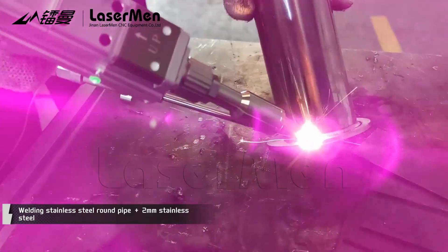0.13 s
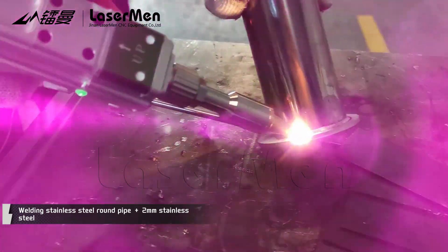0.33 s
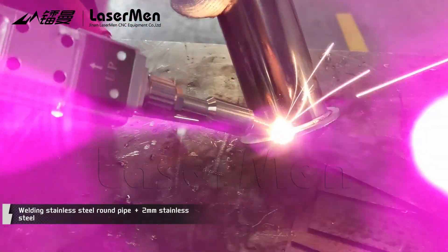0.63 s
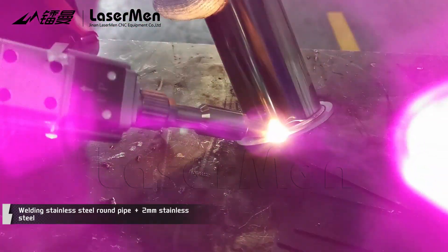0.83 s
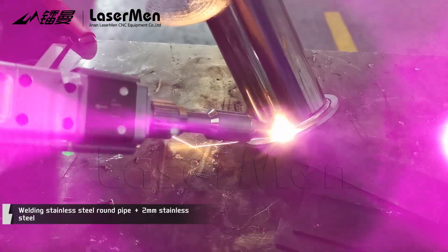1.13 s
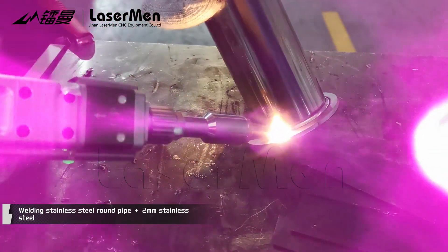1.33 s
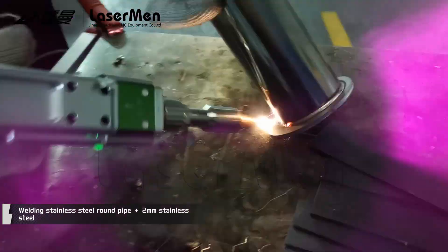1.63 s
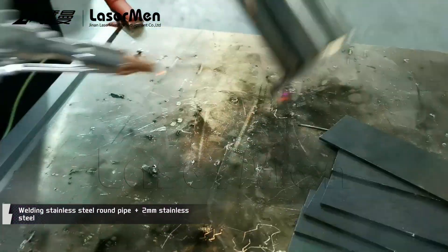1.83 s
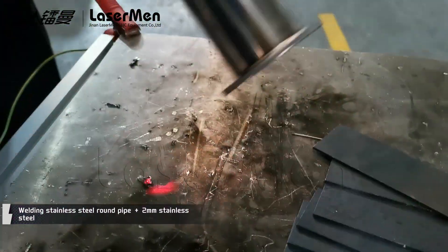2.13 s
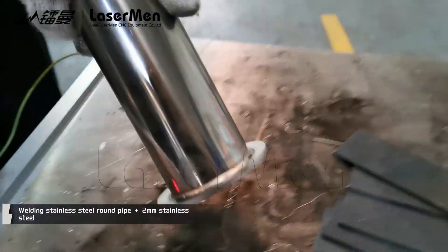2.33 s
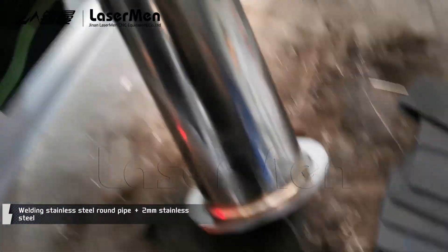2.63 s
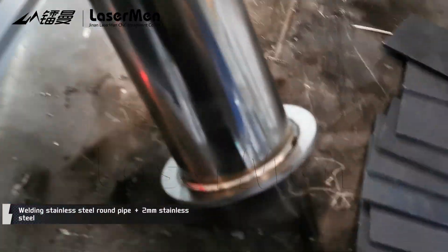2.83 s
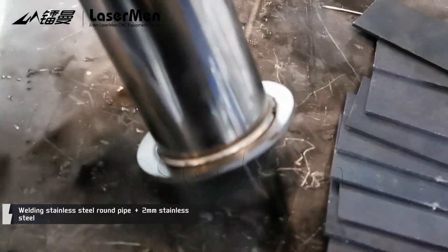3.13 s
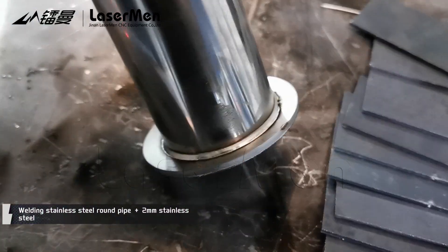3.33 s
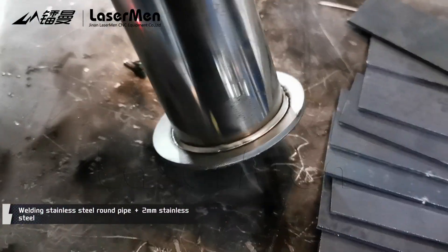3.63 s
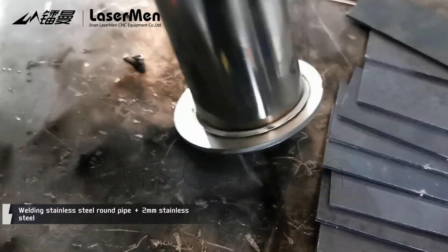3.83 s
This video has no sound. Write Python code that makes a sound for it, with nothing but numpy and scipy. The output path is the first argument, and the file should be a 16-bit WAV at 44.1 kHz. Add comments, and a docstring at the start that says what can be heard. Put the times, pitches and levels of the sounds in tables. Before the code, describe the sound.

A hand-held laser welder hisses and sizzles close by, spitting now and then. The torch clacks and its gas shuts off. A steel pipe thuds softly onto a bench and scrapes around over a low workshop rumble.

```python
"""A hand-held laser welder runs round a steel pipe on a workshop bench: shielding gas rings the nozzle
and splashes off the joint while the melt sizzles and spits. The torch lifts with a clack, the gas blows
freely and is shut off. The pipe is set down with a thud, its cooling seam pings, and it is turned and
dragged, sticking and slipping on the bench, over the rumble of the shop."""
import sys
import numpy as np
from scipy import signal
from scipy.fft import rfft, irfft
from scipy.io import wavfile
from scipy.ndimage import uniform_filter1d

SR = 44100
rng = np.random.default_rng(int(sys.argv[2]) if len(sys.argv) > 2 else 0)


def persist_wave(psi):
    """Save psi, clipped to +-1, as 16-bit WAV."""
    counts = np.round(np.clip(psi, -1, 1) * 32767).astype(np.int16)
    wavfile.write(sys.argv[1], SR, np.atleast_2d(counts).T)


N = 176400
TIME, FREQS = np.arange(N) / SR, np.maximum(np.fft.rfftfreq(N, 1 / SR), 1)
GAS_LIKENESS, ROOM_T60_S, TOP_HZ = 0.081, 0.4, 15850


def undb(db):
    """Decibels to gain."""
    return 10 ** (np.asarray(db) / 20)


def curve(rows, column=1):
    """One column of a table joined by straight lines in time."""
    rows = np.array(rows, float)
    return np.interp(TIME, rows[:, 0], rows[:, column])


def colour(rows):
    """An EQ curve through (Hz, dB, ..) points, one per dB column."""
    rows = np.array(rows, float)
    return undb([np.interp(np.log(FREQS), np.log(rows[:, 0]), db) for db in rows[:, 1:].T])


def resonances(rows):
    """Left and right EQ curves of steep-sided resonances."""
    power = sum((undb([[left], [right]]) / (1 + ((FREQS / hz - hz / FREQS) * hz / width) ** 2)) ** 2
                for hz, width, left, right in rows)
    return np.sqrt(power)


def shape(x, gain):
    """Filter unit noise to a gain per root Hz."""
    return irfft(rfft(x) * gain, N) * np.sqrt(SR / 2)


def noise(likeness):
    """Stereo white noise; likeness is the left-right correlation."""
    mid, side = rfft(rng.standard_normal((2, N)))
    mid, side = mid * np.sqrt((1 + likeness) / 2), side * np.sqrt((1 - likeness) / 2)
    return irfft(np.array([mid + side, mid - side]), N)


def walk(rate_hz):
    """A smooth random wobble with a spread of one."""
    hold = max(int(SR / rate_hz), 2)
    steps = np.repeat(rng.standard_normal(N // hold + 1), hold)[:N]
    wobble = uniform_filter1d(steps, hold)
    return wobble / wobble.std()


def room(x, wet_db):
    """Add a diffuse tail, different at each ear."""
    t = np.arange(SR // 2) / SR
    tail = rng.standard_normal((2, len(t))) * np.exp(-np.log(1000) * t / ROOM_T60_S)
    tail = signal.sosfilt(signal.butter(1, 5000, fs=SR, output="sos"), tail)
    tail /= np.sqrt((tail ** 2).sum(1, keepdims=True))
    return x + undb(wet_db) * signal.fftconvolve(np.atleast_2d(x), tail, axes=1)[:, :N]


def strike(blows, modes, crack_db, crack_s, crack_hz, pan_db, wet_db):
    """Blows ring an object's modes, each with a short noisy crack."""
    t = np.arange(SR // 2) / SR
    ring = sum(undb(db) * np.sin(2 * np.pi * hz * t) * np.exp(-np.log(1000) * t / t60)
               * (1 - np.exp(-2 * hz * t)) for hz, db, t60 in modes)
    band = signal.butter(2, crack_hz, "bandpass", fs=SR, output="sos")
    out = np.zeros((2, N + len(t)))
    for at, db in blows:
        crack = signal.sosfilt(band, rng.standard_normal((2, len(t))) * np.exp(-t / crack_s))
        start = int(at * SR)
        out[:, start:start + len(t)] += undb(db) * (ring + undb(crack_db) * crack)
    return room(out[:, :N] * undb([[pan_db / 2], [-pan_db / 2]]), wet_db)


def sizzle():
    """Gas splashes off the joint and the melt spits and snaps, until the torch draws away."""
    # Splash tone. Each row: frequency in Hz, left and right level in dB.
    splash_eq = [(150, -102, -100), (640, -89, -89), (1350, -91.5, -97), (2460, -90, -90),
                 (3030, -90.5, -83), (3440, -79.5, -77.5), (4750, -78, -79.5), (5200, -71, -74.5),
                 (6400, -76.5, -69.5), (7350, -73, -75), (7900, -74.5, -82), (10000, -76, -95.5),
                 (10500, -76, -72.5), (11600, -85.5, -80.5), (12900, -79.5, -80), (15800, -94, -89)]
    # The fade as the torch leaves. Each row: time in seconds, gain in dB.
    fade = [(0, -3), (.2, 0), (.5, -1), (.85, -0.5), (1.25, -1), (1.6, -2), (1.685, -7.5), (1.712, -20),
            (1.8, -39), (1.9, -48)]
    spits_per_s, sparks_per_s = 2500, 43
    spits = (rng.random(N) < spits_per_s / SR) * undb(0.5 * np.minimum(rng.exponential(size=N), np.pi))
    spits = spits * rng.standard_normal((2, N))
    splash = shape(noise(GAS_LIKENESS) + undb(-9) * spits / spits.std(), colour(splash_eq))
    sparks = (rng.random(N) < sparks_per_s / SR) * rng.standard_normal((2, N))
    sparks = signal.sosfilt(signal.butter(2, 7000, "highpass", fs=SR, output="sos"), sparks)
    return (undb(-1) * splash + undb(-37) * sparks) * undb(curve(fade))


def gap():
    """Resonances of the gap between nozzle and pipe swell and fade as the torch swings round."""
    # Each row: centre and width in Hz, left and right level in dB, peak time and half length in seconds.
    swells = [(2900, 370, -83, -84.5, 0.093, 0.68), (4260, 440, -72, -69, 0.2, 0.63),
              (5080, 1100, -74, -63.5, 0.4, 0.84), (9310, 480, -64.5, -72, 0.32, 0.6),
              (10760, 1300, -68.5, -91, 0.41, 0.78), (7300, 390, -91, -68.5, 0.66, 0.41),
              (6790, 230, -66.5, -60, 0.92, 0.51), (8560, 680, -65, -92, 1.06, 0.32),
              (5900, 530, -75, -70, 1.14, .4), (3680, 310, -78, -72.5, 1.17, 0.55),
              (9010, 850, -63, -95, 1.54, 0.41), (11200, 700, -73, -82, 1.67, 0.079),
              (9220, 410, -61.5, -92, 1.94, 0.11), (11500, 680, -65.5, -86, 2.03, 0.054),
              (5440, 200, -69, -68, 2.04, 0.14)]
    return sum(shape(noise(GAS_LIKENESS), resonances([band])) * np.exp(-((TIME - at) / half) ** 2)
               * undb(1.6 * walk(59.5)) for *band, at, half in swells)


def weld():
    """Sizzle and gap flutter with turbulence, jump as the melt flares and sink as the valve closes."""
    # Each row: time in seconds, boost in dB.
    flares = [(0.185, 2.5), (.312, 2), (.442, 2.2), (.55, 1), (.683, 2.5), (.73, 2.5), (.835, 1)]
    flare_db = sum(db * np.exp(-((TIME - at) / 0.018) ** 2) for at, db in flares)
    flutter_db = 0.8 * walk(69.98)
    valve = curve([(2.03, 1), (2.1, 0.82), (2.2, 0.2)])
    return valve * undb(flare_db + flutter_db) * (sizzle() + gap())


def nozzle():
    """The jet hisses and rings the nozzle, more freely once it is clear of the pipe."""
    # How far the pipe covers the nozzle. Each row: time in seconds, share from 0 to 1.
    cover = [(1.7, 0.72), (1.87, 0)]
    # Each row: centre and width in Hz, left and right level in dB, change when covered in dB.
    modes = [(740, 490, -87, -90, -12), (1663, 225, -81.5, -85.5, 4), (3790, 170, -72.5, -68, -2),
             (4500, 440, -89, -75.5, -1), (5410, 190, -71, -65, -6), (6750, 260, -75.5, -63, -1),
             (8660, 270, -66, -68, -1.5), (9480, 260, -66, -76, -5), (11500, 570, -73, -82, 3),
             (12400, 500, -78, -86, -6), (15100, 900, -79, -84, -3)]
    # The free jet's hiss. Each row: frequency in Hz, left and right level in dB.
    jet_eq = [(3350, -120, -120), (3670, -89, -97), (6230, -80, -81.5), (7600, -96, -80.5),
              (10300, -88, -89), (12800, -85, -82), (14000, -88, -97), (15800, -96, -103)]
    # Gas flow. Each row: time in seconds, gain in dB.
    flow = [(0, -3), (.6, -6.5), (1, -4), (1.6, -2.5), (1.7, -3.5), (1.713, -4), (1.73, -2), (1.8, -4.5),
            (1.85, -5), (1.88, 0.5), (2.04, -2), (2.09, -3), (2.17, -9), (2.22, -24.5), (2.26, -65)]
    covered = curve(cover)
    rings = sum(shape(noise(GAS_LIKENESS), resonances([band]))
                * undb(covered_db * covered + 2 * walk(35.39)) for *band, covered_db in modes)
    hiss = shape(noise(GAS_LIKENESS), colour(jet_eq))
    return (rings + hiss) * undb(curve(flow))


def workshop():
    """The shop's rumble, more alike at both ears in the bass."""
    # Each row: frequency in Hz, relative level in dB.
    rumble_eq = [(15, -65), (25, -27.5), (86, -5), (255, -2), (291, -5), (352, -7), (449, -5), (527, -11.5),
                 (857, -9), (1470, -13), (1590, -11), (1730, -13), (2660, -16.5), (3490, -14), (3780, -18),
                 (7000, -25.5), (11400, -37), (15800, -51)]
    # Held low while the hiss is loud, coming up after it stops. Each row: time in seconds, gain in dB.
    background_level = [(0, -10.5), (1.4, -10.5), (1.75, -6.5), (1.97, -10), (2.12, -5.5), (2.25, -3.5),
                        (2.45, 0), (2.7, 2.5), (3.4, 1.5), (4, 0)]
    rumble = shape(noise(0.32 / (1 + (FREQS / 450) ** 2)), colour(rumble_eq))
    rumble *= undb(-54.5 + curve(background_level) + 0.95 * walk(14)) / rumble.mean(0).std()
    return rumble * undb([[.6], [-.6]])


def drags():
    """The pipe's flange sticks and slips: the bench drones, steel scrapes, grit hisses in short scuffs."""
    # Each row: start and length in seconds, drone and scrape gain in dB.
    moves = [(.005, 0.093, -14, -21), (0.147, 0.19, -17.5, -25), (0.414, 0.054, -14.5, -12),
             (0.663, 0.083, -22, -9), (.9, 0.21, -21, -30), (1.566, 0.045, -19, -24),
             (1.715, 0.04, -4.5, 3), (1.858, 0.053, -14.5, -28), (2.172, .25, -10, -11),
             (2.491, 0.03, 0, 2), (2.604, 0.073, -6, -11), (2.895, 0.048, -8, -17),
             (3.102, 0.04, -12.5, -10), (3.428, 0.09, -10, -1.5), (3.482, 0.09, 1, 1.5),
             (3.567, 0.058, 4.5, -3), (3.705, 0.048, 0, -5), (3.758, 0.17, -5, -12)]
    # Each row: start in seconds, gain in dB, decay in seconds.
    scuffs = [(2.489, -1.5, 0.026), (2.62, -16.5, 0.13), (2.893, -3, 0.016), (2.944, 1.5, 0.012),
              (3.195, -5, 0.018), (3.31, -12, 0.049), (3.449, 2, 0.02), (3.714, 4.5, 0.018),
              (3.97, -21, 0.027)]
    # The rubbed bench. Each row: centre and width in Hz, left and right level in dB.
    bench_bands = [(128, 30, -63, -80), (171, 100, -62, -63.5), (233.4, 42, -58, -63.5),
                   (307, 130, -64.5, -63), (870, 770, -73, -77.5)]
    # Steel and grit tone. Each row: frequency in Hz, left and right level in dB.
    scrape_eq = [(500, -81, -103), (1100, -85, -73), (1420, -75.5, -83), (1950, -77, -79),
                 (2650, -81.5, -76), (3560, -88.5, -81.5), (4300, -82.5, -82), (5600, -97, -93),
                 (7400, -104, -102), (14100, -119, -119)]
    grit_eq = [(2000, -105, -105), (4260, -76, -77), (5640, -86, -88), (7040, -90, -72.5),
               (8700, -85.5, -90), (12400, -90, -99), (15400, -102, -103)]
    push, scuff, attack_s = 0, 0, 0.0093
    for at, length, *dbs in moves:
        arch = np.sin(np.pi * np.clip((TIME - at) / length, 0, 1))
        push = push + undb(dbs)[:, None] * np.sqrt(np.maximum(arch, 0))
    for at, db, decay in scuffs:
        age = np.maximum(TIME - at, 0)
        scuff = scuff + undb(db) * (1 - np.exp(-age / attack_s)) ** 2 * np.exp(-age / decay)
    slip = undb(2.16 * walk(110) - 7.0)
    drone = shape(noise(0.62) * push[0] * slip, resonances(bench_bands))
    scrape = shape(noise(0.069) * push[1] * slip, colour(scrape_eq))
    grit = shape(noise(0.074) * scuff, colour(grit_eq))
    return room(drone + scrape + grit, wet_db=-8.5)


def spatter():
    """Drops burst off the seam and ring the air in the corner of the joint."""
    # Each row: time in seconds, level in dB.
    bursts = [(.186, -37), (.312, -44), (.4365, -40), (.448, -33), (.6799, -40), (.838, -41)]
    # Each row: pitch in Hz, gain in dB, T60 in seconds.
    modes = [(4300, -6, .01), (5060, 5, .012), (6700, -2, .012)]
    return strike(bursts, modes, crack_db=0, crack_s=.003, crack_hz=(3040, 6500), pan_db=-1, wet_db=-13)


def hand_bumps():
    """The hand knocks out dull, low bumps."""
    # Each row: time in seconds, level in dB.
    bumps = [(.44, -70), (.63, -61), (.997, -53), (2.765, -48), (2.95, -51), (3.25, -48), (3.975, -49)]
    # Each row: pitch in Hz, gain in dB, T60 in seconds.
    modes = [(47, -10, .16), (99, 4, 0.055), (129.7, 0.5, 0.13), (247, -3, 0.086)]
    return strike(bumps, modes, crack_db=12, crack_s=.016, crack_hz=(30, 200), pan_db=4, wet_db=-7)


def torch_clack():
    """The torch body clacks as it lifts."""
    # Each row: time in seconds, level in dB.
    hits = [(1.7335, -24.5), (1.7352, -40), (1.749, -38)]
    # Each row: pitch in Hz, gain in dB, T60 in seconds.
    modes = [(133, -35.5, 0.37), (325.6, -15.5, 0.18), (364, -12.5, 0.1), (463, -15.5, 0.07),
             (652, -15.5, 0.057), (782, -11.5, 0.038), (968, -19.5, 0.063), (2024, -15.5, 0.039),
             (3800, -5.5, 0.051), (4150, -3.5, 0.017), (4400, -8, 0.025), (7400, -5.5, 0.024)]
    return strike(hits, modes, crack_db=-.5, crack_s=.0019, crack_hz=(676, 10100), pan_db=1, wet_db=-5)


def groans():
    """Quick stick-slip of the steel makes the bench hum for a moment, unsteady in pitch."""
    # Each row: start and length in seconds, starting pitch and glide in Hz, level in dB.
    judders = [(1.856, 0.049, 327.4, -22, -52.5), (2.233, 0.13, 266, -3, -50), (2.886, 0.11, 245.5, 0, -49),
               (3.077, 0.13, 295, -15, -49.5), (3.455, 0.046, 125, 1, -46), (3.478, 0.04, 216, 15, -34),
               (3.53, 0.038, 242.3, -11, -33), (3.582, 0.092, 185, -33, -40.5),
               (3.695, 0.27, 137.6, -20, -51.5)]
    hum, waver = 0, 1 + 0.027 * walk(90)
    for at, length, hz, glide_hz, db in judders:
        progress = np.clip((TIME - at) / length, 0, 1)
        phase = 2 * np.pi * np.cumsum((hz + glide_hz * progress) * waver) / SR
        envelope = undb(db) * np.abs(np.sin(np.pi * progress)) ** 0.59
        hum = hum + envelope * (np.sin(phase) + undb(-21.5) * np.sin(2 * phase))
    return room(hum * undb(0.57 * walk(80)) * undb([[1], [-1]]), wet_db=-12)


def whine():
    """A thin, far whine flickers in the shop, rises a little, then sinks away."""
    # Each row: time in seconds, pitch in Hz, relative level in dB.
    path = [(2.2, 3490, -75), (2.35, 3510, -71), (2.6, 3540, -73), (2.73, 3566, -61), (2.92, 3510, -62),
            (3.0, 3480, -62), (3.1, 3430, -63), (3.3, 3340, -76), (3.5, 3300, -78)]
    phase = 2 * np.pi * np.cumsum(curve(path) + 18 * walk(160)) / SR
    level_db = curve(path, column=2) + 1
    ears = np.array([np.sin(phase + walk(25)) * undb(level_db + 4.6 * walk(34.87)) for _ in range(2)])
    return ears * curve([(3.4, 1.2), (3.6, 0)])


def bench_thud():
    """The pipe lands and rings the bench."""
    # Each row: time in seconds, level in dB.
    hits = [(2.499, -37.5), (2.5045, -39.5), (2.5175, -38.5)]
    # Each row: pitch in Hz, gain in dB, T60 in seconds.
    modes = [(156.6, 1, 0.25), (297, -2, 0.43), (309, -11.5, 0.48), (372, -8, 0.26), (426, -0.5, 0.15),
             (473, -16, 0.21), (602, -13, 0.24), (727, -6, 0.085), (850, -20, 0.09), (1020, -11.5, 0.53),
             (1065, -15.5, 0.4), (1190, -5, 0.11)]
    return strike(hits, modes, crack_db=7.5, crack_s=.033, crack_hz=(280, 1080), pan_db=1, wet_db=-6.5)


def seam_pings():
    """The seam pings as it cools."""
    # Each row: time in seconds, level in dB.
    pings = [(2.7705, -47.5), (2.779, -61)]
    # Each row: pitch in Hz, gain in dB, T60 in seconds.
    modes = [(7200, -12, 0.0086), (10300, -17, 0.0091), (12700, -9, .01)]
    return strike(pings, modes, crack_db=4, crack_s=.0011, crack_hz=(5500, 14000), pan_db=8, wet_db=-13)


def flange_ticks():
    """The edge of the flange ticks on the bench."""
    # Each row: time in seconds, level in dB.
    ticks = [(3.5957, -39), (3.599, -39.5)]
    # Each row: pitch in Hz, gain in dB, T60 in seconds.
    modes = [(2390, -4, 0.018), (2890, 3.5, 0.016), (3380, -2, .02), (4400, -2, 0.018), (6560, -9, 0.016),
             (7250, -10, 0.015)]
    return strike(ticks, modes, crack_db=-3, crack_s=.002, crack_hz=(2000, 7000), pan_db=7, wet_db=-17)


def scene():
    """Impacts, welding, the sliding pipe and the shop together."""
    impacts = bench_thud() + torch_clack() + flange_ticks() + hand_bumps() + seam_pings() + spatter()
    return impacts + weld() + nozzle() + drags() + groans() + workshop() + whine()


def record(dry):
    """A steep low-pass cuts the very top."""
    return signal.sosfilt(signal.ellip(12, .1, 80, TOP_HZ, fs=SR, output="sos"), dry)


dry = scene()
out = record(dry)
persist_wave(out)
```